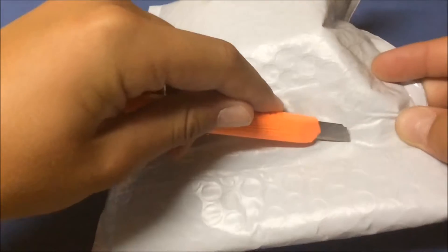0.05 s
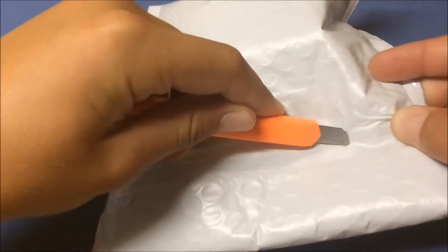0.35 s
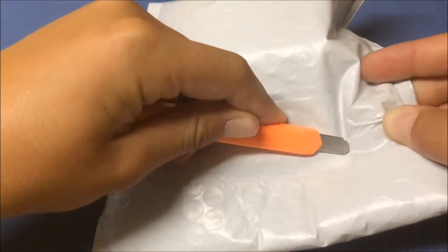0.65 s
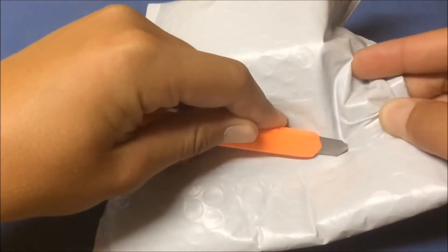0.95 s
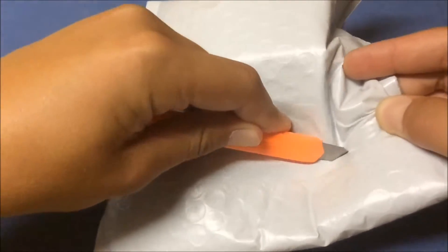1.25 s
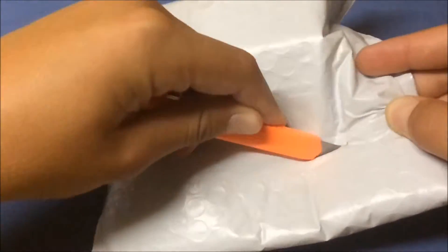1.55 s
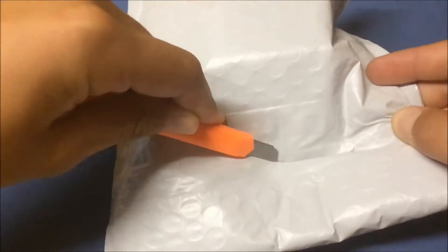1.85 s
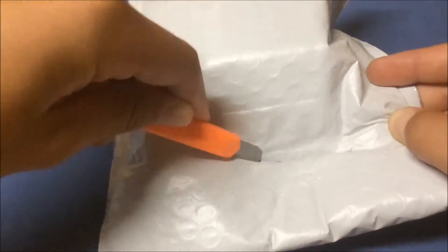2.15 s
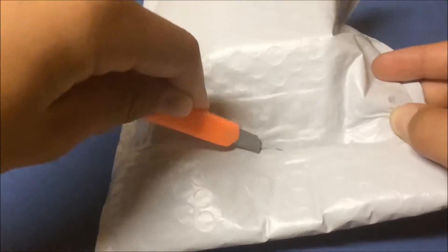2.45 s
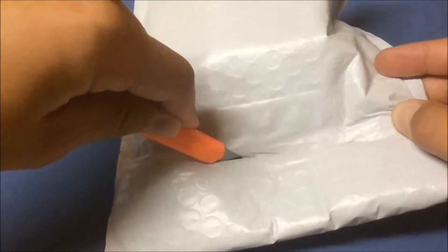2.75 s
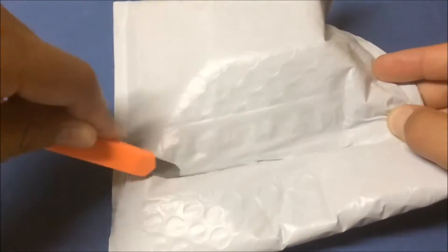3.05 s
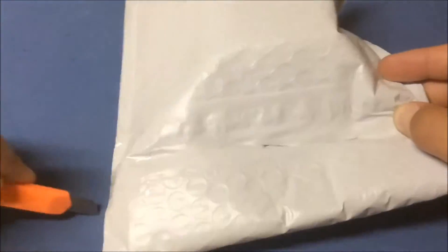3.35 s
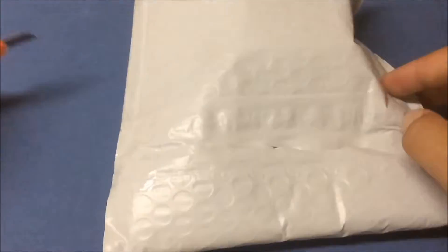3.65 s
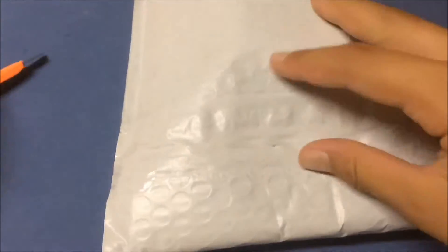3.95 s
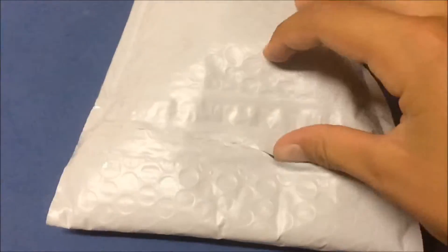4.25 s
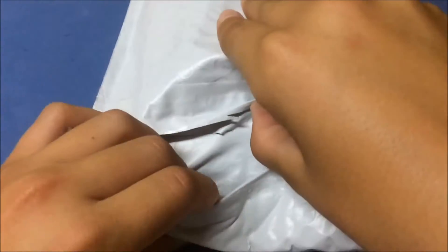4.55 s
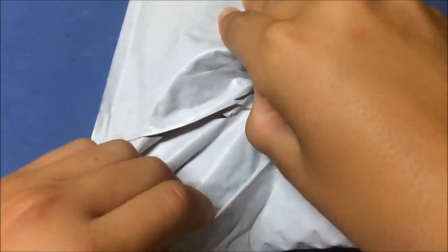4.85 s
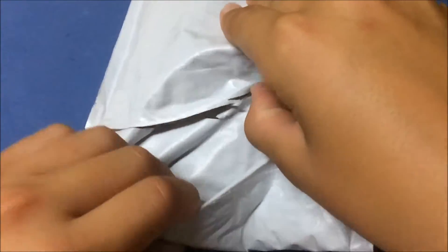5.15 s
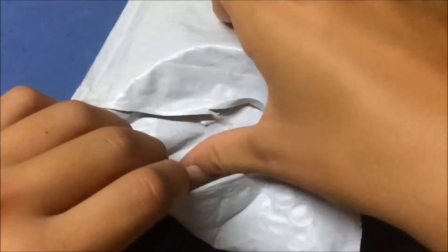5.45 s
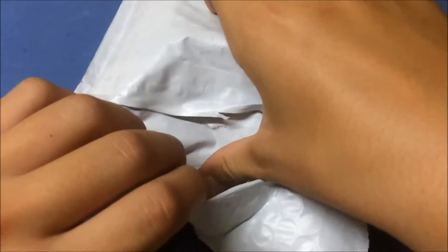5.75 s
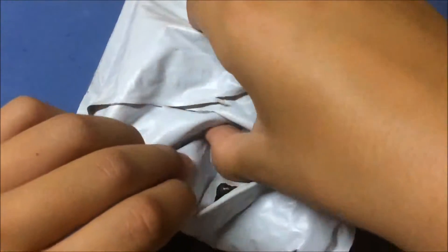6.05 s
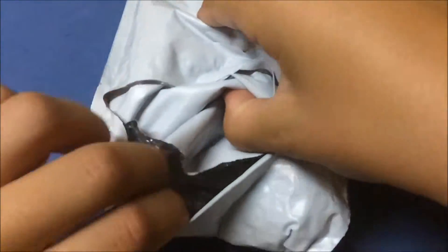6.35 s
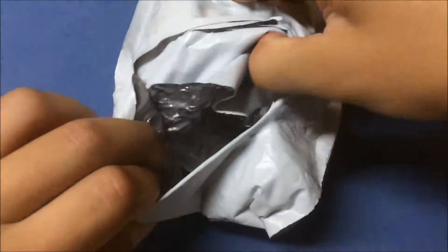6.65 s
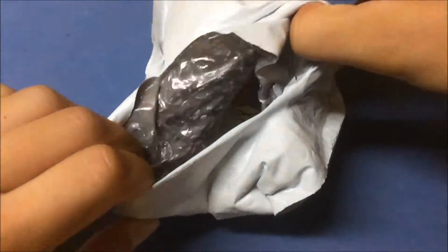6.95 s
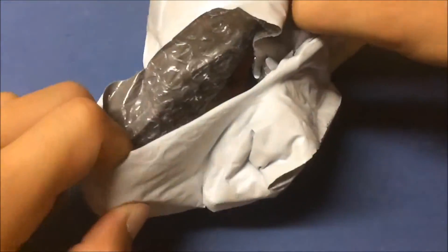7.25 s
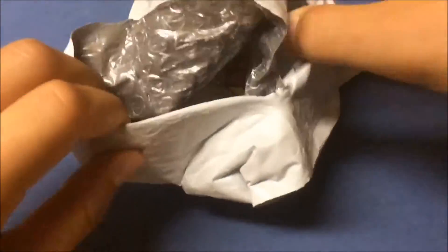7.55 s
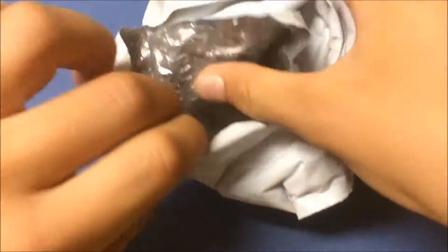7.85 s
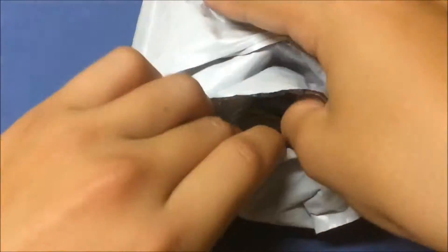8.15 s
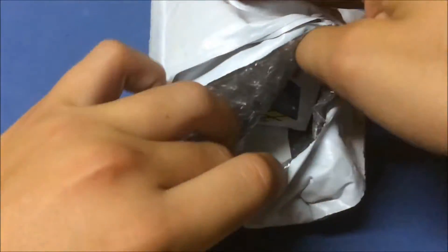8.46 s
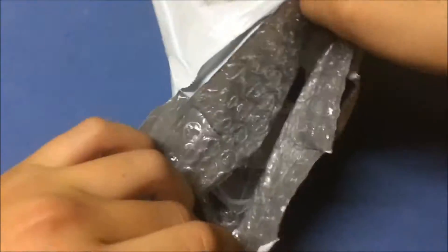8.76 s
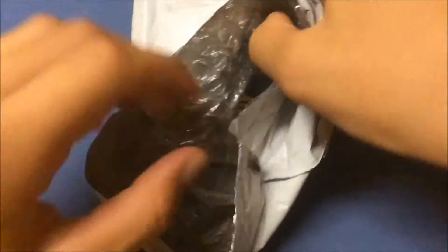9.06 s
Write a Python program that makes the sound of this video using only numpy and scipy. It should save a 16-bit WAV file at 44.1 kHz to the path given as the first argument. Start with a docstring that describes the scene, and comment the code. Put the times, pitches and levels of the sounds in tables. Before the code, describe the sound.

Close up in a small room, a plastic bubble mailer is cut open on a table. The blade makes light, crisp ticks and short rips, then hands take over with steady crinkling, hollow crackles and a few soft taps and knocks. The loudest moment comes late, when the seam bursts with a quick ripping pop. The room adds a short echo and faint hum.

```python
"""Opening a plastic bubble mailer

A mailer on a table in a small room is slit with a utility knife, then pulled open by hand.
Each fold that flips makes a sharp tick and a short hollow ring near 1.1 kHz; crinkles and rips are
dense runs of these. The blade catches in crisp clicks, and at last the seam gives way in jerks.
The hands also tap the mailer and bump the table; the room adds a short echo and a faint hum."""
import sys
import numpy as np
from scipy import signal
from scipy.fft import rfft, irfft
from scipy.io import wavfile

SR = 44100
rng = np.random.default_rng(int(sys.argv[2]) if len(sys.argv) > 2 else 0)


def generate_wav(sig):
    """Save sig (samples, or channels by samples) to the path in sys.argv[1] as 16-bit PCM at SR."""
    pcm = np.round(np.clip(np.atleast_2d(sig).T, -1, 1) * 32767).astype(np.int16)
    wavfile.write(sys.argv[1], SR, pcm)


N = 410571
TIME = np.arange(N) / SR
LEAD_S = .001  # a fold creaks this long before it flips

# Levels in the tables are starting values: the functions add their own gains and filters.
# tone colours (f/Hz, level/dB)
AIR_TONE = [(20, -6.5), (45, -10.5), (85, -18.5), (200, -23.5), (500, -21), (700, -32.5), (1200, -19.5),
            (2700, -35.5), (12800, -50), (16000, -67)]  # the quiet room
BUMP_TONE = [(10, 15), (25, 6.5), (50, -7.5), (80, -12), (150, -10.5), (280, -16.5), (600, -25.5),
             (2000, -45)]  # the table
TICK_TONE = [(300, -20.5), (700, -24.5), (1600, 3.5), (2300, 0.5), (3500, -2.5), (4600, 1), (5700, -4.5),
             (7300, -4.5), (9000, -10.5), (13000, -12), (16000, -27)]  # the sharp edge of a flipping fold
POUCH_TONE = [(100, -16), (220, -1), (400, -1.5), (780, -3.5), (950, -3), (1080, 5), (1350, 1.5),
              (1700, -1), (2400, -3), (5000, -3)]  # the hollow of the mailer
SLIDE_TONE = [(150, -5), (400, -12), (780, -7.5), (1100, 0), (1300, 0), (1600, -13), (2500, -23),
              (5000, -25)]  # plastic film rubbing
WALL_TONE = [(150, -13.5), (500, 5), (1150, -8), (2500, -5.5), (5000, -3.5), (14000, 0.5)]  # the echo
# hands shifting the mailer on the table (t/s, level/dB)
SHIFTING = [(0, -68.5), (0.75, -62.5), (1.25, -57.5), (2.55, -60), (2.7, -60), (3.3, -51), (3.6, -56.5),
            (4.1, -56), (4.75, -64), (5.0, -58.5), (7.2, -60), (7.6, -56), (8.5, -62), (8.61, -46.5),
            (8.8, -49.5), (9.31, -49.5)]
# the mailer knocking on the table (t/s, level/dB, f/Hz)
KNOCKS = [(1.258, -47, 121), (1.272, -48, 340), (1.601, -58, 280), (2.679, -44.5, 108), (2.833, -48, 131),
          (2.867, -52, 152), (2.956, -52, 141), (3.279, -47, 139), (4.089, -51.5, 150), (4.738, -45, 240),
          (7.578, -53, 102), (7.654, -51.5, 100), (7.934, -45.5, 100), (8.599, -35, 111), (8.633, -36, 99)]
# the table top humming on after some knocks (t/s, level/dB)
TABLE_HUMS = [(2.691, -53), (2.86, -60), (3.29, -58.5), (4.761, -56)]
# the table top's own note (f/Hz, level/dB, time to fade by 60 dB/s)
TABLE_NOTES = [(145, 0, 0.41)]
# the film stirring just from being held (t/s, level/dB)
HOLDING = [(0, -80), (0.12, -85), (0.55, -69), (1.35, -73.5), (1.95, -68.5), (2.3, -82), (2.55, -92),
           (2.9, -66), (3.45, -77.5), (3.8, -74), (4.6, -59.5), (5.09, -71), (5.4, -64), (6.7, -58),
           (7.33, -66), (8.2, -60.5), (8.8, -63), (9.3, -64)]
# how the hold colours the film (t/s, thinning of the lows from 0 to 1, amount of rattle)
HOLD_COLOUR = [(0, 0.4, 0), (0.6, 0.2, 0.34), (0.8, 1, 0.35), (1.25, 0.1, 1.9), (1.7, 0.07, 0.69),
               (2.4, 0.48, 0.089), (3.3, 0.93, 0.37), (4.3, 0.34, 0), (4.75, 0.04, 1), (5.4, 0, 0.32),
               (6.1, 0.86, 0), (6.7, 0.56, 0.58), (7.4, 0, 0.25), (9.3, 0, 0)]
# moves that work the film (t/s, length/s, level/dB, tick over ring/dB)
KNIFE_PUSHES = [(0.16, 0.12, -77, -4), (0.33, 0.15, -66, -3.5), (0.84, 0.1, -68, -4),
                (1.19, 0.097, -53.5, -13), (1.40, 0.075, -56, -14.5), (1.55, 0.15, -56, -9.5),
                (1.79, 0.16, -70, -18), (2.11, 0.073, -58.5, -10), (2.60, 0.17, -57.5, -10.5),
                (2.82, 0.12, -56.5, -10), (3.11, 0.053, -58, -6), (3.27, 0.045, -57, -10),
                (3.41, 0.053, -51.5, -9), (3.53, 0.065, -64, -6)]  # the knife drags it along
HAND_PULLS = [(3.91, 0.14, -60.5, -8.5), (4.08, 0.087, -53.5, -28), (4.39, 0.092, -59.5, 0.5),
              (4.65, 0.065, -52, -6), (4.75, 0.13, -51.5, -10), (4.94, 0.053, -56.5, -12),
              (5.14, 0.25, -54, -7.5), (5.24, 0.042, -48, -3.5), (5.56, 0.097, -53.5, -14),
              (5.83, 0.3, -54.5, -5.5), (6.19, 0.048, -48, -8), (6.38, 0.15, -57.5, 3.5),
              (6.55, 0.13, -50, -4), (6.81, 0.11, -62.5, 2), (6.88, 0.093, -52.5, -1),
              (7.04, 0.072, -51.5, -3), (7.42, 0.17, -54, -4), (7.62, 0.08, -58.5, -2),
              (7.90, 0.075, -55, -5.5), (8.02, 0.19, -54, -5.5), (8.33, 0.043, -53, 0),
              (8.44, 0.1, -54, -5.5), (8.54, 0.17, -49.5, -4), (8.93, 0.076, -50.5, -1.5),
              (9.03, 0.23, -57.5, -8.5)]  # the hands grip, pull and fold it
# loud single folds flipping (t/s, ring level/dB, f/Hz, tick level/dB)
FOLD_SNAPS = [(0.061, -48.5, 1270, -48.5), (0.208, -51, 1140, -54.5), (0.335, -55, 1500, -45),
              (0.46, -42.5, 1260, -45), (1.003, -31.5, 1330, -48.5), (1.207, -42, 1090, -51.5),
              (1.263, -25, 1250, -39.5), (1.585, -26.5, 1050, -39), (1.614, -31, 1110, -42.5),
              (1.636, -36, 1100, -54), (1.806, -38.5, 1580, -48.5), (1.853, -37.5, 1000, -47),
              (1.907, -43.5, 1620, -60), (2.03, -48, 1580, -59.5), (2.12, -29, 1230, -54),
              (2.137, -42, 1110, -61), (2.325, -37, 980, -44), (2.399, -31, 1240, -38),
              (2.646, -31.5, 1210, -42.5), (2.673, -19, 1040, -37.5), (2.803, -50, 1120, -47.5),
              (2.835, -30, 1410, -41), (2.856, -28, 1220, -41.5), (2.872, -37.5, 1050, -61),
              (2.964, -38, 1150, -56), (3.082, -35.5, 1280, -47), (3.277, -23, 1240, -38),
              (3.536, -27.5, 1270, -42), (3.578, -36.5, 1050, -48.5), (4.097, -36, 1080, -53),
              (4.134, -33.5, 1060, -46), (4.333, -41, 1020, -46.5), (4.409, -35, 1020, -43),
              (4.458, -35, 1190, -54), (4.667, -26.5, 1180, -43.5), (4.738, -13.5, 1220, -39),
              (4.792, -31, 1210, -48), (4.841, -37.5, 1510, -44), (4.979, -35, 1120, -62),
              (5.023, -29.5, 1060, -46.5), (5.119, -35.5, 970, -72), (5.151, -34.5, 1090, -42),
              (5.213, -48, 1220, -46), (5.242, -36.5, 1250, -60), (5.278, -32.5, 1150, -46),
              (5.33, -34.5, 1220, -43), (5.342, -46, 1210, -47.5), (5.373, -38.5, 1060, -70),
              (5.386, -40, 1040, -57), (5.447, -40.5, 1320, -55), (5.518, -38, 1160, -49),
              (5.584, -30.5, 1270, -47), (5.616, -37, 1370, -42.5), (5.702, -27.5, 1450, -52),
              (5.837, -26.5, 1270, -43.5), (5.914, -32.5, 1210, -43), (5.955, -35.5, 1150, -40),
              (6.008, -30, 1090, -44), (6.049, -25.5, 1180, -38), (6.123, -43, 1130, -47),
              (6.139, -36, 1070, -62), (6.191, -34.5, 1050, -46), (6.21, -29, 980, -39.5),
              (6.227, -35, 1510, -43.5), (6.321, -33.5, 1160, -67), (6.349, -37.5, 1240, -61.5),
              (6.395, -33.5, 1020, -36), (6.438, -32, 1260, -36.5), (6.496, -25.5, 1280, -37),
              (6.528, -42, 1200, -34.5), (6.57, -25, 1500, -49), (6.681, -43, 1140, -38),
              (6.722, -31.5, 1260, -45), (6.814, -36, 1340, -49.5), (6.863, -34.5, 1140, -54.5),
              (6.924, -31, 1120, -55), (6.935, -35, 1210, -43), (6.95, -39, 1140, -37.5),
              (6.963, -40, 1090, -38.5), (7.048, -31.5, 1140, -39.5), (7.089, -27, 1130, -60),
              (7.116, -34.5, 1470, -43.5), (7.189, -35.5, 990, -62), (7.253, -43.5, 1150, -44),
              (7.5, -57, 1340, -42.5), (7.565, -32.5, 1120, -45.5), (7.582, -29.5, 1070, -40),
              (7.665, -34, 1010, -56), (7.813, -40, 1230, -50), (7.832, -35, 1170, -45),
              (7.902, -42, 1160, -52), (8.034, -39.5, 1160, -48), (8.052, -37, 1150, -47),
              (8.075, -35, 1130, -50), (8.105, -41, 1130, -49), (8.168, -38.5, 1040, -48),
              (8.248, -34, 980, -58), (8.342, -41, 1080, -67), (8.458, -34.5, 1030, -46),
              (8.56, -37.5, 1150, -40), (8.571, -35.5, 1130, -41), (8.59, -41, 1050, -39),
              (8.604, -9.5, 1100, -28.5), (8.608, -26, 1190, -28.5), (8.636, -27, 1130, -33),
              (8.87, -28, 1040, -46), (8.934, -28.5, 1140, -37.5), (8.973, -27.5, 1070, -37),
              (9.109, -30, 1120, -47), (9.238, -33, 1040, -63)]
# the blade tip catching on the film (t/s, level/dB)
BLADE_CATCHES = [(0.229, -50), (0.424, -48.5), (0.718, -56), (0.73, -45.5), (0.743, -60), (0.7549, -44),
                 (0.781, -46), (0.842, -43), (0.861, -47), (0.879, -49), (0.914, -51.5), (0.961, -50),
                 (0.991, -58.5), (1.112, -49), (1.135, -43)]
# the film's notes under the blade (f/Hz, level/dB, time to fade by 60 dB/s)
PLUCK_NOTES = [(1140, 7, 0.026), (1430, 6, 0.015), (1910, -8, 0.028), (2260, -6, 0.026),
               (3160, -13.5, 0.013), (4620, -21, 0.0057)]
# the film giving way in a run (t/s, length/s, ring level/dB, tick level/dB)
FILM_RIPS = [(1.234, .073, -48.5, -58.5), (1.58, 0.061, -56.5, -69), (2.669, .024, -40.5, -53),
             (2.855, 0.031, -46.5, -58), (4.735, 0.009, -33, -39), (4.753, 0.068, -46.5, -53),
             (8.592, 0.013, -45, -43), (8.606, 0.041, -30, -36), (8.644, .028, -45, -46.5)]
# tight film splitting with a bright zip (t/s, level/dB)
FILM_SPLITS = [(2.4, -47.5), (2.646, -55), (3.275, -54), (3.538, -46), (5.264, -41.5), (6.535, -60),
               (8.036, -55), (8.629, -42)]
# fingers tapping and denting the mailer (t/s, level/dB, f/Hz)
FINGER_TAPS = [(4.19, -56.5, 380), (5.19, -55, 430), (5.443, -54.5, 385), (7.436, -52.5, 413),
               (8.146, -46, 434), (8.205, -50, 477), (8.868, -41.5, 430)]
# the seam giving way (t/s, peak level/dB, f/Hz)
SEAM_JERKS = [(8.592, -29, 1110), (8.599, -24, 1110), (8.6046, -5.5, 1127), (8.6164, -15, 1120),
              (8.6238, -16, 1070), (8.6312, -12.5, 1120), (8.642, -15, 1120)]


def undb(db):
    """Turn decibels into a gain."""
    return 10 ** (np.asarray(db) / 20)


def unit(x):
    """Scale to an average strength (rms) of 1."""
    return x / np.sqrt(np.mean(x ** 2))


def curves(table):
    """Join a table's rows with straight lines: one curve for each column after the time."""
    times, *columns = np.transpose(table)
    return [np.interp(TIME, times, column) for column in columns]


def add(out, x, s):
    """Mix x into out, starting at s seconds."""
    i = max(int(s * SR), 0)
    out[i:i + len(x)] += x[:max(len(out) - i, 0)]


def colour(x, points, size=4096):
    """Give x a tone colour from (f/Hz, level/dB) points."""
    hz, db = np.transpose(points)
    grid_hz = np.arange(size // 2 + 1) * SR / size
    gain = undb(np.interp(np.log(grid_hz + 1), np.log(hz), db))
    # build the filter so that it never sounds before its input
    cepstrum = irfft(np.log(gain))
    cepstrum[1:size // 2] *= 2
    cepstrum[size // 2 + 1:] = 0
    response = irfft(np.exp(rfft(cepstrum)))
    return signal.fftconvolve(x, response[:len(x)])[:len(x)]


def resonate(x, hz, width_hz):
    """Make x ring at one pitch; lows pass and highs fall away."""
    pole = np.exp((2j * np.pi * hz - np.pi * width_hz) / SR)
    return signal.lfilter([1], [1, -2 * pole.real, abs(pole) ** 2], x)


def strike(notes, size=2048):
    """A struck object: fading notes, each slightly off pitch, with rms 1 over the first 8 ms."""
    t = np.arange(size) / SR
    detunes = 1 + .025 * rng.standard_normal(len(notes))
    x = sum(undb(db) * np.sin(2 * np.pi * hz * detune * t) * np.exp(-t * np.log(1000) / fade_s)
            for (hz, db, fade_s), detune in zip(notes, detunes))
    return x / np.sqrt(np.mean(x[t < .008] ** 2))


def background(air_db=-67.5, hum_hz=112.8, hum_db=-75):
    """Quiet room air and a faint electrical hum."""
    air = unit(colour(rng.standard_normal(N), AIR_TONE))
    hum = unit(np.sin(2 * np.pi * hum_hz * TIME))
    return undb(air_db) * air + undb(hum_db) * hum


def table_bumps(shifting_db=4, knock_s=0.013, size=16384):
    """Hands and mailer rumble and knock on the table; some knocks leave it ringing."""
    rumble = unit(colour(rng.standard_normal(N), BUMP_TONE))
    out = rumble * undb(curves(SHIFTING)[0] + shifting_db)
    age = np.arange(size) / SR / knock_s
    swell = 2 * age * np.exp(1 - 2 * age)
    for s, db, hz in KNOCKS:
        knock = swell * resonate(rng.standard_normal(size), hz, width_hz=hz)
        add(out, undb(db) * knock * np.linalg.norm(swell) / np.linalg.norm(knock), s)
    for s, db in TABLE_HUMS:
        add(out, undb(db) * strike(TABLE_NOTES, size), s)
    return out


def fold_flip(hz, uneven_db=0, fizz=0.2, flutter=0.1, creak_s=0.0008, settle_s=0.0044, size=1500):
    """One fold creaks, jolts, then flutters. Gives its ring and its tick, each starting at rms 1."""
    t = (np.arange(size) - int(LEAD_S * SR)) / SR
    jolt = (t == 0) * 1.
    shake = np.exp(-abs(t) / np.where(t < 0, creak_s, settle_s))

    def vary(tone, spread_db):  # each fold has its own size and place, so its own colour
        return [(f, db + spread_db * rng.standard_normal()) for f, db in tone]

    ring = resonate(jolt + flutter * shake * rng.standard_normal(size), hz, width_hz=350)
    ring = colour(ring, vary(POUCH_TONE, uneven_db), size=1024)
    tick = jolt + fizz * shake * rng.standard_normal(size)
    tick = colour(tick, vary(TICK_TONE, spread_db=3), size=512)
    onset = int((LEAD_S + .008) * SR)
    sign = rng.choice([-1, 1])
    return [sign * x / np.sqrt(np.mean(x[:onset] ** 2)) for x in (ring, tick)]


def crackle(n, per_second, spread_db, hz=1190, scatter=0.18, tick_spread_db=4, fizz=0.23, count=14):
    """Many folds flip at random times and strengths. Gives rings and ticks, each at rms 1."""
    rings, ticks = np.zeros(n), np.zeros(n)
    folds = [fold_flip(hz * np.exp(scatter * rng.standard_normal()), uneven_db=2, fizz=fizz)
             for _ in range(count)]
    for _ in range(int(per_second * n / SR) + 1):
        s = rng.random() * n / SR
        force, crispness = np.clip(rng.standard_normal(2), -2, 2)
        ring, tick = folds[rng.integers(count)]
        add(rings, ring * undb(spread_db * force), s)
        add(ticks, tick * undb(spread_db * force + tick_spread_db * crispness), s)
    return unit(rings), unit(ticks)


def move_power(moves, rise_s, fall_s):
    """Power of rings and ticks as each move builds up, holds and dies away."""
    power = np.zeros((2, N))
    for s, length, db, bright_db in moves:
        age = np.arange(int((length + 6 * fall_s) * SR)) / SR
        effort = np.minimum(age / rise_s, 1) * np.exp(-np.maximum(age - length, 0) / fall_s)
        add(power[0], (undb(db) * effort) ** 2, s)
        add(power[1], (undb(db + bright_db) * effort) ** 2, s)
    return power


def crinkles(tick_db=-3, slide_db=-8.5, hiss_db=-8):
    """Small folds flip and film rubs on film and skin, as hard as knife and hands work it."""
    held_db = curves(HOLDING)[0]
    held = undb([held_db, held_db - 4]) ** 2  # rings, then softer ticks
    knife = move_power(KNIFE_PUSHES, rise_s=0.02, fall_s=0.029)
    hands = move_power(HAND_PULLS, rise_s=0.013, fall_s=0.03)
    low_gain, high_gain = np.sqrt(held + knife + hands)
    rings, ticks = crackle(N, per_second=300, spread_db=6.3, fizz=.14, count=40)
    # small folds move too little air for the pouch's lowest tones
    rings = signal.sosfilt(signal.butter(1, 260, "high", fs=SR, output="sos"), rings)
    # rubbing comes in fits and starts: a new level 70 times a second
    fits = unit(undb(2 * np.interp(TIME, np.arange(1000) / 70, rng.standard_normal(1000))))
    slide = fits * unit(colour(rng.standard_normal(N), SLIDE_TONE))
    hiss = fits * unit(colour(rng.standard_normal(N), TICK_TONE))
    lows = rings + undb(slide_db) * slide
    highs = undb(tick_db) * ticks + undb(hiss_db) * hiss
    return low_gain * lows + high_gain * highs


def snaps(ring_gain_db=-10, tick_gain_db=-7, early_s=.0004):
    """Single folds of the film flip or burst loudly."""
    out = np.zeros(N)
    for s, ring_db, hz, tick_db in FOLD_SNAPS:
        ring, tick = fold_flip(hz)
        snap = undb(ring_db + ring_gain_db) * ring + undb(tick_db + tick_gain_db) * tick
        add(out, snap, s - early_s)
    return out


def blade_catches(tick_db=-16, low_cut_hz=750):
    """The blade sticks and slips, plucking the tight film: a thin note with a faint tick."""
    out = np.zeros(N)
    for s, db in BLADE_CATCHES:
        add(out, undb(db) * strike(PLUCK_NOTES), s)
        _, tick = fold_flip(PLUCK_NOTES[0][0])
        add(out, undb(db + tick_db) * tick, s - LEAD_S)
    return signal.sosfilt(signal.butter(2, low_cut_hz, "high", fs=SR, output="sos"), out)


def rips(fade_share=0.21):
    """The cut runs ahead in a fast string of tiny breaks."""
    out = np.zeros(N)
    for s, length, ring_db, tick_db in FILM_RIPS:
        n = int(length * SR)
        rings, ticks = crackle(n, per_second=900, spread_db=3, hz=1130, scatter=.08)
        rip = undb(ring_db) * rings + undb(tick_db) * ticks
        add(out, rip * signal.windows.tukey(n, fade_share), s)
    return out


def splits(above_hz=9000, length_s=0.0056):
    """A slit shoots through stretched film with a tiny burst of very high hiss."""
    out = np.zeros(N)
    fade = np.linspace(1, 0, int(length_s * SR)) ** 2
    treble = signal.butter(2, above_hz, "high", fs=SR, output="sos")
    for s, db in FILM_SPLITS:
        burst = rng.laplace(size=len(fade)) * fade
        add(out, undb(db) * unit(signal.sosfilt(treble, burst)), s)
    return out


def finger_taps(fade_s=0.017, overtone_ratio=1.52, overtone_db=-5):
    """A finger makes the air in the mailer give a short hollow knock."""
    out = np.zeros(N)
    for s, db, hz in FINGER_TAPS:
        notes = [(hz, 0, fade_s), (hz * overtone_ratio, overtone_db, fade_s / 2)]
        add(out, undb(db) * strike(notes), s)
    return out


def seam_jerks(rise_s=0.00086, fall_s=0.0015, size=1024):
    """Each jerk of the seam pumps the pouch, whose ring swells and dies within a few cycles."""
    out = np.zeros(N)
    t = (np.arange(size) - size // 2) / SR
    swell = np.exp(-abs(t) / np.where(t < 0, rise_s, fall_s))
    for s, db, hz in SEAM_JERKS:
        ring = np.sin(2 * np.pi * (hz * t + rng.random()))
        add(out, undb(db) * swell * ring, s + t[0])
    return out


def held_film(x, thinning_depth=0.73, below_hz=800, rattle_gain=0.67, rattle_hz=2500):
    """Pinned flat or stretched, the pouch loses its lows; cut or torn, it rattles more brightly."""
    thinning, rattle = curves(HOLD_COLOUR)
    octave = [rattle_hz / np.sqrt(2), rattle_hz * np.sqrt(2)]
    lows = signal.sosfiltfilt(signal.butter(2, below_hz, fs=SR, output="sos"), x)
    upper = signal.sosfiltfilt(signal.butter(1, octave, "band", fs=SR, output="sos"), x)
    return x + rattle_gain * rattle * upper - thinning_depth * np.clip(thinning, 0, 1) * lows


def room_echo(x, echo_db=-9, fade_s=0.1, gap_s=0.0062):
    """Nearby walls add a short, blurred echo."""
    t = np.arange(SR // 2) / SR
    tail = rng.standard_normal(len(t)) * (t > gap_s) * np.exp(-t * np.log(1000) / fade_s)
    tail = colour(tail / np.linalg.norm(tail), WALL_TONE)
    return x + undb(echo_db) * signal.fftconvolve(x, tail)[:N]


def scene():
    """The mailer, the table and the room, in one channel."""
    film = held_film(snaps() + rips() + splits() + crinkles())
    mailer = film + blade_catches() + seam_jerks() + finger_taps()
    return (room_echo(mailer) + table_bumps() + background())[None]


def record(dry):
    """Cut away the highest treble, above 15.9 kHz."""
    return signal.sosfilt(signal.ellip(10, .2, 80, 15900, fs=SR, output="sos"), dry)


dry = scene()
out = record(dry)
generate_wav(out)
```